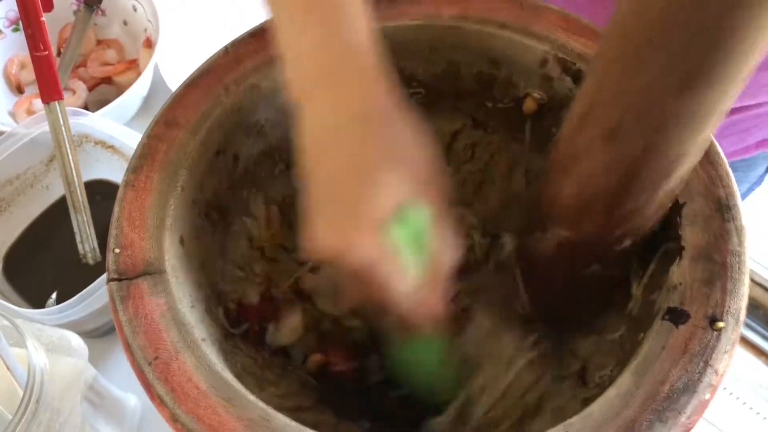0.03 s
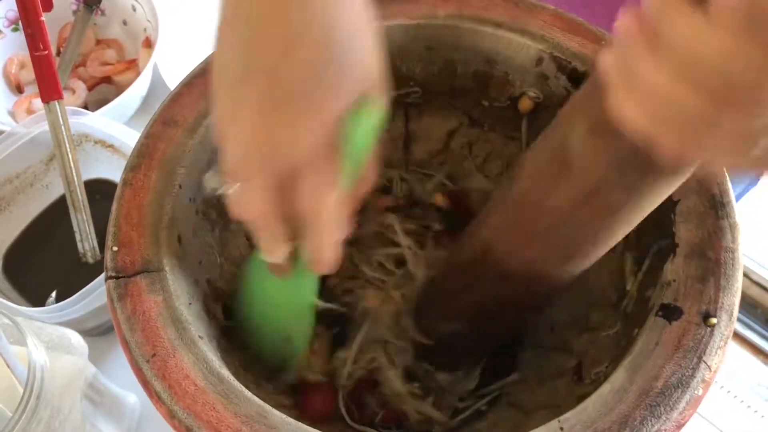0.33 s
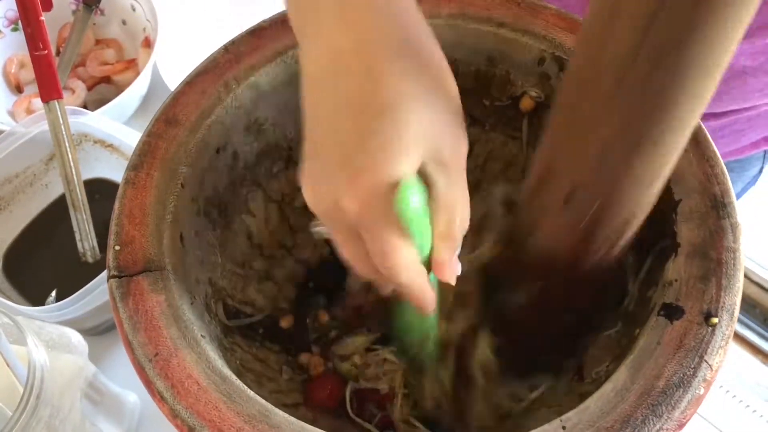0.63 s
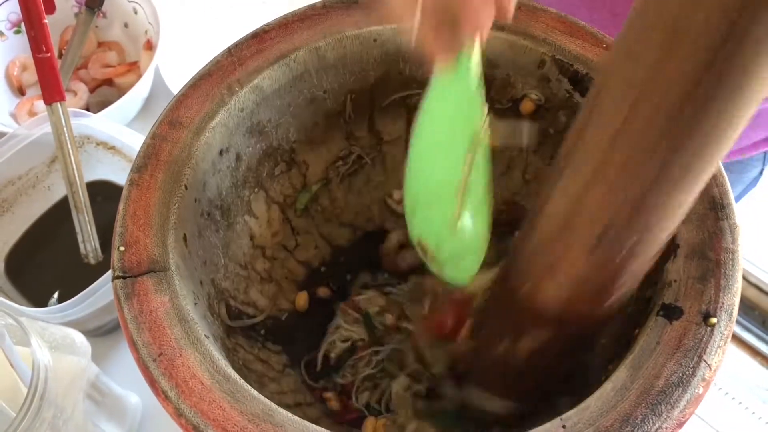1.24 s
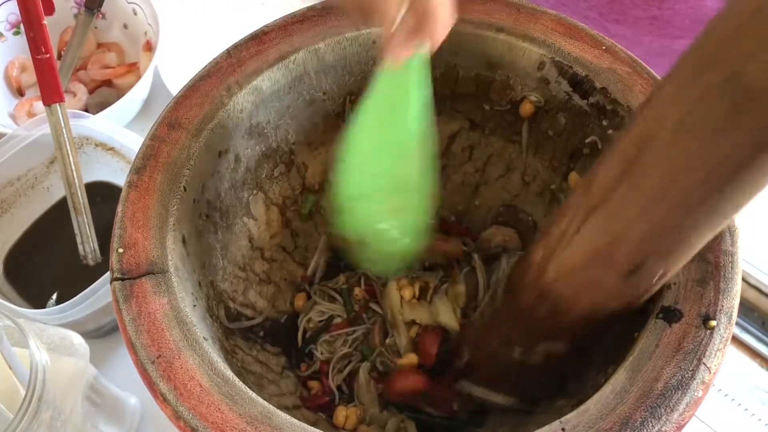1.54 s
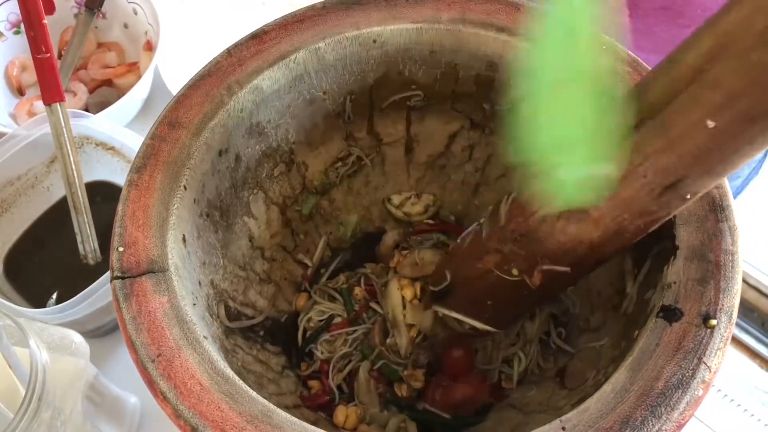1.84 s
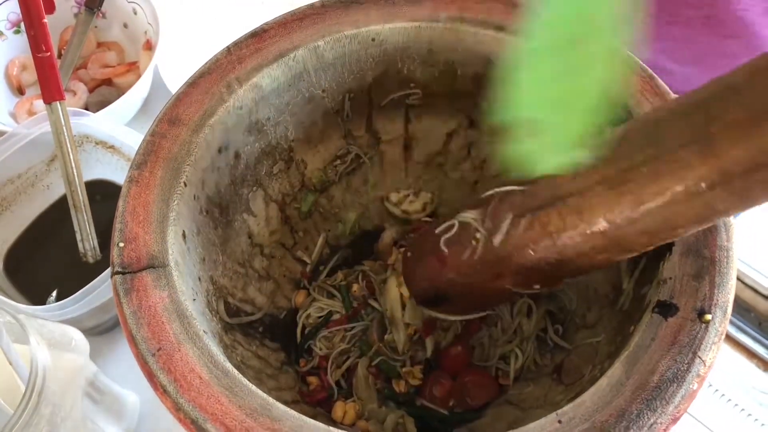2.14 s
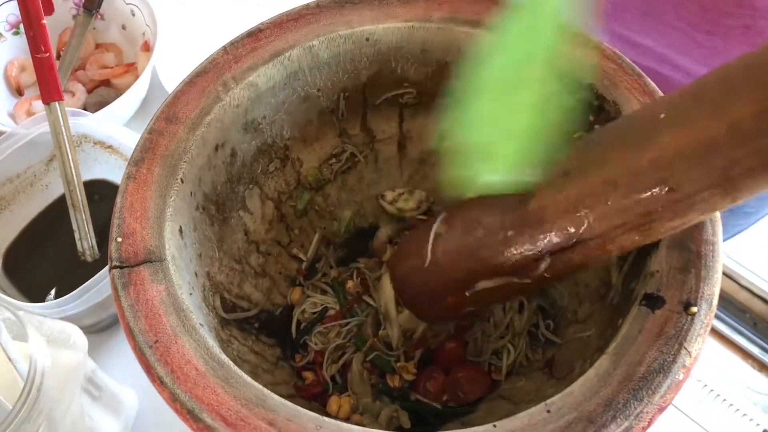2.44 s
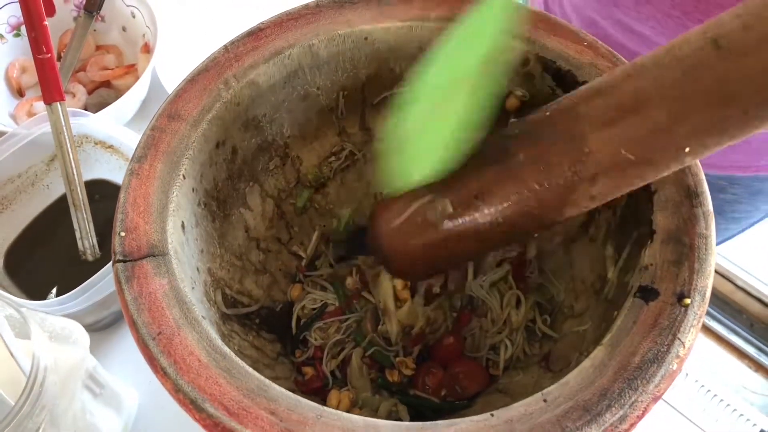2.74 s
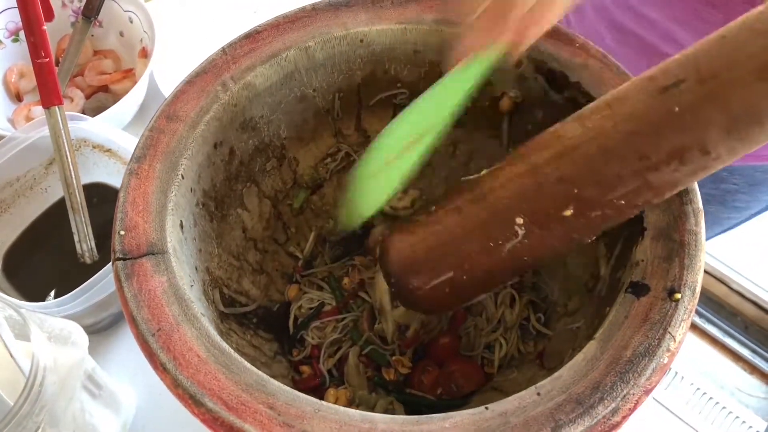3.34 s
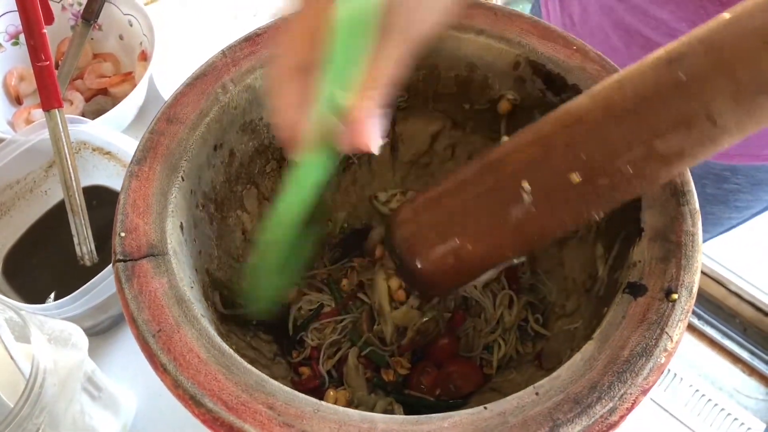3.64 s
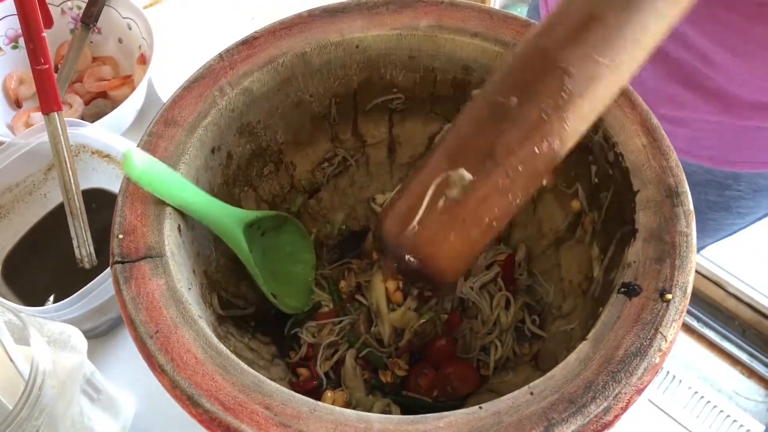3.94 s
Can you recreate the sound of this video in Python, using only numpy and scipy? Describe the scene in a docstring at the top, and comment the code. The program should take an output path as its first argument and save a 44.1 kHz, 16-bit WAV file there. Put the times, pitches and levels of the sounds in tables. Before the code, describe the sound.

Wet salad squelches in a clay mortar before a plastic spoon taps and wipes the pestle.

```python
"""A motor hums in a kitchen throughout. First a plastic spoon turns wet, shredded salad in a
clay mortar: scoops squelch, shreds snap and tiny bubbles burst. Around 1.5 s the mortar is
knocked and rings. From 1.9 s the spoon taps the wooden pestle and wipes down it six times.
Near 3.8 s it is dropped in the bowl. The close microphone clips on the hardest taps."""
import sys
import numpy as np
from scipy import signal
from scipy.fft import rfft, irfft, next_fast_len
from scipy.io import wavfile
from scipy.ndimage import map_coordinates

SR = 44100
rng = np.random.default_rng(int(sys.argv[2]) if len(sys.argv) > 2 else 0)


def inscribe(sig):
    """Save sig as 16-bit PCM at rate SR to the path in sys.argv[1].

    A 1-D sig is mono; a 2-D sig holds one channel per row.
    Samples are clipped to [-1, 1] before scaling.
    """
    pcm = np.round(np.clip(np.atleast_2d(sig).T, -1, 1) * 32767)
    wavfile.write(sys.argv[1], SR, pcm.astype(np.int16))


N = 176400
TOP_HZ = 15900  # highest pitch kept

# tones of the clay wall: f/Hz, level/dB, t60/s (time to fade by 60 dB)
WALL_TONES = [(969, -31.5, 0.65), (1029, -28, .26), (1075, -16, 0.045), (1318, -37, 0.43),
              (1360, -38, 0.12), (1580, -35, 0.12), (1650, -21, 0.35), (1790, -34, .28), (2160, -40, 0.22),
              (2870, -32, .2), (3200, -43, .1), (3900, -55, .18), (4810, -41, .12)]
# tones of the air in the bowl: f/Hz, level/dB, t60/s
HOLLOW_TONES = [(469.3, -26.5, 0.27), (420, -46, 0.24)]


def amp(db):
    return 10 ** (np.asarray(db) / 20)


def unit(x):
    """Scale to an average (rms) strength of 1."""
    return x / np.sqrt(np.mean(x ** 2) + 1e-20)


def along(points, hz):
    """Read a curve of (f/Hz, value) points on a log pitch axis."""
    f, v = np.transpose(points)
    return np.interp(np.log(hz + 1), np.log(f + 1), v)


def seconds(length):
    return np.arange(int(length * SR)) / SR


def add(track, start, x):
    """Mix x into the track at a time in seconds."""
    i = round(start * SR)
    x = x[max(-i, 0):N - i]
    track[max(i, 0):][:len(x)] += x


def gate(t, attack, release):
    """Fade in, hold, fade out."""
    return np.clip(t / attack, 0, 1) * np.clip((t[-1] - t) / release, 0, 1)


def click(colour, cutoff_hz=1e6, size=2048):
    """A click with this colour (level at each pitch), dulled above the cut-off."""
    hz = np.fft.rfftfreq(size, 1 / SR)
    gain = unit(amp(along(colour, hz))) / np.hypot(1, (hz / cutoff_hz) ** 2)
    cepstrum = irfft(np.log(gain))
    cepstrum[1:size // 2] *= 2  # folding packs the energy at the start
    cepstrum[size // 2 + 1:] = 0
    return irfft(np.exp(rfft(cepstrum)))


def friction(t, colour, slips_per_s, grit):
    """Rubbing: tiny random slips over a smooth rush."""
    n = len(t)
    slips = (rng.random(n) < slips_per_s / SR) * rng.choice([-1, 1], n) * rng.uniform(.3, 1, n) ** 2
    rubbing = grit * unit(slips) + rng.standard_normal(n)
    return unit(signal.fftconvolve(rubbing, click(colour))[:n])


def resonance(hz, q):
    """Noise around a gliding pitch; a higher q is more like a whistle."""
    pole = np.exp(-np.pi * hz.mean() / q / SR)
    noise = rng.standard_normal(len(hz)) + 1j * rng.standard_normal(len(hz))
    slow_noise = signal.lfilter([1], np.poly([pole, pole]), noise)
    return unit((slow_noise * np.exp(2j * np.pi * np.cumsum(hz) / SR)).real)


def ring(tones, length, spread_db):
    """Fading tones whose levels vary from blow to blow."""
    t = seconds(length)
    return sum(amp(db + spread_db * rng.standard_normal() - 60 * t / t60) * np.sin(2 * np.pi * hz * t)
               for hz, db, t60 in tones)


def motor():
    """A motor's wavering hum over the soft rush of room air."""
    # steady motor tones: f/Hz, level/dB
    motor_tones = [(53.8, -59), (158, -52), (210, -52.5)]
    # electric hum: t/s, level/dB, octave level/dB
    mains_levels = [(0, -45, -48.5), (1.0, -56, -50.5), (1.3, -47.5, -44.5), (2.0, -52, -47.5),
                    (2.6, -42.5, -43.5), (3.001, -44, -55.5), (4, -44, -54.5)]
    # room air: f/Hz, level/dB
    air_colour = [(20, -26), (45, -18), (114, -8.5), (190, 1), (277, -10.5), (384, -10.5), (624, -15.5),
                  (840, -19.5), (1440, -15.5), (3720, -21), (6050, -25.5), (9070, -36), (20000, -38)]
    t = np.arange(N) / SR

    def wobble(rate):
        return map_coordinates(rng.standard_normal(int(t[-1] * rate) + 4), [t * rate])

    times, low_db, high_db = np.transpose(mains_levels)
    mains_hz = 119.9
    mains = [(mains_hz, np.interp(t, times, low_db)), (2 * mains_hz, np.interp(t, times, high_db))]
    hum = sum(amp(db + 1.8 * wobble(5.07)) * np.sin(2 * np.pi * hz * t + 0.2 * wobble(5.7))
              for hz, db in list(motor_tones) + mains)
    air = unit(signal.fftconvolve(rng.standard_normal(N), click(air_colour))[:N])
    return np.sqrt(2) * hum + amp(-46) * air


def kitchen_echo(x, stretches=13):
    """The room echoes each stretch of sound a little differently; the highs die first."""
    # how long the echo lasts: f/Hz, t60/s
    fade_times = [(150, 0.61), (500, 0.33), (1400, 0.46), (2400, 0.48), (5000, 0.47), (10000, 0.3),
                  (20000, 0.22)]
    # the echo as it starts: f/Hz, level/dB
    echo_colour = [(100, -1.5), (600, 0.5), (2200, -3), (6000, -6), (10000, -4.5), (20000, -2)]
    out = np.zeros(N)
    for part in np.array_split(np.arange(N), stretches):
        hz, t, noise = signal.stft(rng.standard_normal(SR * 2 // 3), SR, nperseg=256)
        fade = amp(along(echo_colour, hz)[:, None] - 60 * t / along(fade_times, hz)[:, None])
        tail = signal.istft(noise * fade, SR, nperseg=256)[1]
        add(out, part[0] / SR + .006, signal.fftconvolve(x[part], tail / np.linalg.norm(tail)))
    return out


def bowl_ring(x):
    """Stirring rings the air in the bowl and, faintly, its wall, which the food muffles."""
    hollow = ring(HOLLOW_TONES, length=.4, spread_db=3)
    ringing = hollow + amp(-9) * ring(WALL_TONES, length=.4, spread_db=1)
    return x + amp(-21.5) * signal.fftconvolve(x, ringing / np.linalg.norm(ringing))[:N]


def wall_echoes(x, t):
    """Echoes off the bowl's wall come sooner as the spoon travels."""
    # echo paths: delay/s, gain
    paths = [(.00095, 0.26), (.0017, 0.57), (.0026, 0.12)]
    shrink = 1 - 0.24 * t / t[-1]
    echoes = sum(gain * np.interp(t - delay * shrink, t, x, left=0) for delay, gain in paths)
    return (x + echoes) / np.sqrt(1 + sum(gain ** 2 for _, gain in paths))


def contact(pulse, t60=0.022):
    """A sharp hit, then its echoes scattering inside the bowl."""
    t = seconds(.06)
    scatter = rng.standard_normal(len(t)) * amp(-60 * t / t60) * np.clip(t / 0.00035, 0, 1)
    scatter *= amp(-3.5) / np.linalg.norm(scatter)
    scatter[0] = 1  # the hit itself
    return signal.fftconvolve(scatter, pulse)


def juice(count=900, low_hz=2260, high_hz=14000, fade_cycles=18.5):
    """Tiny bubbles burst, each at its own pitch, loudest while the salad is turned."""
    # loudest bubbles: t/s, level/dB
    peak_levels = [(0, -18), (.13, -24), (.3, -16), (.55, -19.5), (.7, -19.5), (.95, -9), (1.1, -23),
                   (1.2, -23.5), (1.349, -24), (1.6, -24), (1.899, -42), (4, -43)]
    out, t = np.zeros(N), seconds(.008)
    for when, pitch, faintness in rng.random((count, 3)):
        start = when * N / SR
        hz = low_hz * (high_hz / low_hz) ** pitch
        db = np.interp(start, *np.transpose(peak_levels)) - 18 * np.sqrt(faintness)
        envelope = amp(db - 60 * t * hz / fade_cycles) * (1 - np.exp(-t * hz))
        add(out, start, envelope * np.sin(2 * np.pi * hz * t))
    return out


def thuds(t60=0.031):
    """Pestle and spoon bump on damp shreds, which soon stop the ringing."""
    # soft bumps: t/s, level/dB, f/Hz
    bumps = [(0.1162, -20, 270), (.219, -21.5, 212), (1.59, -17, 262), (1.634, -18.5, 242),
             (1.677, -28, 310), (2.26, -21, 360)]
    out = np.zeros(N)
    for start, db, hz in bumps:
        add(out, start, ring([(hz, db, t60)], length=.06, spread_db=3))
    return out


def scoops():
    """The spoon squelches through wet salad with a hollow, gliding pitch."""
    # scoops: t/s, length/s, level/dB, first f/Hz, last f/Hz
    strokes = [(-.02, 0.078, -29, 2400, 1373), (0.033, 0.049, -23.5, 1300, 670),
               (.208, 0.027, -26.5, 1050, 870), (0.234, .1, -34, 1400, 1164),
               (0.431, 0.11, -40.5, 2000, 1686), (.49, .085, -30, 1900, 946),
               (0.667, .11, -38.5, 1300, 1690), (0.948, 0.082, -26.5, 1500, 1059),
               (1.027, .12, -44.5, 1200, 1098)]
    # wet rubbing: f/Hz, level/dB
    wet_colour = [(100, -34), (450, 5.5), (1100, 0.5), (2800, -4), (5000, -24), (16000, -22)]
    out = np.zeros(N)
    for start, length, db, first_hz, last_hz in strokes:
        t = seconds(length)
        glide = np.geomspace(first_hz, last_hz, len(t))
        rub = friction(t, wet_colour, slips_per_s=1100, grit=1.2)
        squelch = rub + amp(3) * resonance(glide, q=2) + amp(-8.5) * resonance(2.3 * glide, q=3.5)
        add(out, start, amp(db) * unit(wall_echoes(squelch, t)) * gate(t, attack=0.013, release=0.023))
    return out


def crunches():
    """Shreds crunch under the spoon."""
    # crunches: t/s, length/s, level/dB
    presses = [(-.02, 0.074, -28.5), (0.185, 0.094, -38), (0.262, 0.041, -26), (0.287, 0.056, -44),
               (0.369, 0.05, -29), (0.419, 0.077, -30.5), (0.479, 0.06, -33), (0.663, 0.14, -42.5),
               (0.779, 0.1, -33.5), (0.875, 0.023, -22.5), (0.895, 0.057, -26.5), (0.951, 0.083, -36.5),
               (1.028, 0.17, -49), (1.282, 0.12, -42), (1.479, 0.063, -22.5), (1.706, 0.064, -28)]
    # crushed shreds: f/Hz, level/dB
    crisp_colour = [(200, -20), (900, -1.5), (2300, 3), (4000, 1), (7000, -4), (10000, -7.5), (16000, -13)]
    out = np.zeros(N)
    for start, length, db in presses:
        t = seconds(length)
        crunch = friction(t, crisp_colour, slips_per_s=540, grit=0.74)
        add(out, start, amp(db) * wall_echoes(crunch, t) * gate(t, attack=0.0052, release=0.031))
    return out


def drags():
    """The spoon drags on the clay with a low, gritty scrape."""
    # drags: t/s, length/s, level/dB
    strokes = [(0.081, 0.097, -38.5), (.21, 0.16, -39), (.47, 0.12, -39.5), (0.623, 0.058, -35.5),
               (0.678, 0.12, -34), (0.937, 0.12, -38), (1.588, .05, -27), (1.629, 0.082, -35)]
    # scraped clay: f/Hz, level/dB
    clay_colour = [(25, -34), (60, -19), (130, -6), (240, -4), (350, -8), (470, 6), (580, -12.5),
                   (1300, -11), (4000, -26), (16000, -44)]
    out = np.zeros(N)
    for start, length, db in strokes:
        t = seconds(length)
        scrape = friction(t, clay_colour, slips_per_s=250, grit=2.1)
        add(out, start, amp(db) * scrape * gate(t, attack=0.0027, release=0.033))
    return out


def snaps(rise_s=0.00018):
    """Wet shreds tear, each in a brief cluster of cracks."""
    # tears: t/s, relative level/dB
    tears = [(0.3752, 0), (0.3991, -7), (0.448, -14.5), (0.461, -12), (.787, -3.5), (0.81, -9),
             (0.821, -11), (0.834, -14), (0.852, -17), (0.8828, -12.5), (.9055, -25), (1.3104, -19.5),
             (1.464, -20), (1.4942, 2), (2.2604, 2), (2.5763, 1), (2.9038, 3.5), (3.2309, -3)]
    # one crack: f/Hz, level/dB
    crack_colour = [(100, -40), (450, -2.5), (850, -21.5), (1500, -7), (3000, 2.5), (5000, -1),
                    (7500, -3.5), (11000, -11), (16000, -6)]
    out = np.zeros(N)
    age = seconds(.003) / rise_s
    for start, db in tears:
        cracks = rng.choice([-1, 1], len(age)) * age * np.exp(-age)
        burst = np.convolve(cracks, click(crack_colour))
        add(out, start, amp(db + 11) * contact(burst / np.linalg.norm(burst)))
    return out


def knocks():
    """Blows on the clay: dull through the salad, bright and ringing on the bare wall."""
    # blows: t/s, relative level/dB, cut-off f/Hz (higher is harder), wall/dB, hollow/dB
    blows = [(0.1923, -17.5, 1700, -12, -5), (.218, -10, 1040, 5, 4), (.714, -3, 833, -20, 8.5),
             (1.4716, -1.5, 11200, 0, 3.5), (1.5905, -4, 710, -11, 3), (1.6999, 4, 9700, -3.5, 2),
             (3.468, -23, 990, -6, 3), (3.735, -19, 1176, -15, -7), (3.766, -13.5, 1720, -21, -7),
             (3.8045, 1, 2730, 0, 3), (3.967, -11, 1500, -1, 4.5)]
    # struck clay: f/Hz, level/dB
    knock_colour = [(30, -40), (90, -21), (160, -14), (400, -0.5), (750, -5), (1400, 5), (3000, -1.5),
                    (7000, 0), (16000, -13.5)]
    out = np.zeros(N)
    for start, db, cutoff_hz, wall_db, hollow_db in blows:
        add(out, start, amp(db + 15.5) * contact(click(knock_colour, cutoff_hz)))
        dulled = [(hz, level - 20 * np.log10(np.hypot(1, (hz / cutoff_hz) ** 2)), t60)
                  for hz, level, t60 in WALL_TONES]
        wall = amp(wall_db) * ring(dulled, length=.5, spread_db=1.5)
        hollow = amp(hollow_db) * ring(HOLLOW_TONES, length=.5, spread_db=2.5)
        add(out, start, amp(db - 5.5) * (wall + hollow))
    return out


def wipes(pitch_rise=.17, squelch_s=0.042):
    """The spoon rasps down wet wood; its tone rises and fades as the juicy spray grows."""
    # wipes: t/s, length/s, level/dB, spray/dB, f/Hz, squelch/dB
    strokes = [(1.956, 0.091, -19.5, -4.5, 2035, -5.5), (2.257, 0.088, -18, -0.5, 1998, -10.5),
               (2.573, 0.095, -17.5, -5.5, 2147, -15), (2.9, 0.085, -16, -5, 2064, -10.5),
               (3.232, 0.1, -18, -6, 2279, -10.5), (3.509, 0.085, -25, -7.5, 2109, -15.5)]
    # rubbed wood: f/Hz, level/dB
    rasp_colour = [(80, -44), (170, 3.5), (290, -19), (600, -18.5), (1000, -8.5), (1450, -0.5), (2400, 4.5),
                   (3400, 1), (5000, -6), (8000, -17), (16000, -44)]
    # tones of the sliding spoon: multiple of its pitch, level/dB
    slide_tones = [(.63, -13.5), (1, -2.5), (1.55, -17)]
    # spraying juice: f/Hz, level/dB
    spray_colour = [(200, -33), (900, -5.5), (1700, -14.5), (3800, 7.5), (7000, 2.5), (10000, -2),
                    (16000, -9.5)]
    out = np.zeros(N)
    for start, length, db, spray_db, hz, squelch_db in strokes:
        t = seconds(length)
        progress = t / length
        rasp = friction(t, rasp_colour, slips_per_s=1100, grit=1.16)
        glide = hz * (1 + pitch_rise * progress)
        tone = sum(amp(level) * resonance(k * glide, q=12.8) for k, level in slide_tones)
        body = unit(rasp + tone) * amp(1.5 - 14 * progress ** 2)
        spray = friction(t, spray_colour, slips_per_s=1400, grit=0.93)
        spray *= amp(spray_db - 18 * (progress - .68) ** 2)
        add(out, start, amp(db) * wall_echoes(body + spray, t) * gate(t, attack=0.016, release=0.013))
        # the spoon meets the salad at the foot of the wipe
        t = seconds(squelch_s)
        squelch = resonance(np.geomspace(1068, 693, len(t)), q=1.4) * gate(t, attack=.01, release=0.028)
        add(out, start + length - squelch_s, amp(db + squelch_db) * squelch)
    return out


def taps():
    """The plastic spoon clacks on the pestle and rings briefly."""
    # taps: t/s, relative level/dB, f/Hz
    hits = [(.9056, -6.5, 2300), (1.9206, 7, 2447), (1.9586, 1.5, 1980), (2.249, 7.5, 2500),
            (2.2596, -1.5, 2620), (2.562, 6, 2556), (2.5769, 1, 2130), (2.8814, -0.5, 2520),
            (2.9036, -1, 2810), (3.2184, 4.5, 2560), (3.2305, -2.5, 3030), (3.766, -11.5, 2440),
            (3.8053, 2.5, 3180)]
    # plastic on wood: f/Hz, level/dB
    clack_colour = [(100, -39.5), (400, -7), (800, -10.5), (1500, -2.5), (2600, 2.5), (4000, -1.5),
                    (7000, -14.5), (11000, -30), (16000, -33)]
    # tones of the struck spoon: multiple of its pitch, level/dB, t60/s
    spoon_tones = [(.16, -25, 0.03), (.56, -29.5, 0.006), (1, -11.5, 0.026), (1.17, -17, 0.023),
                   (1.69, -29, 0.006), (2.139, -23, 0.0063), (3.07, -23, 0.011)]
    out = np.zeros(N)
    for start, db, hz in hits:
        add(out, start, amp(db + 9) * contact(click(clack_colour)))
        tones = [(hz * k, level, t60) for k, level, t60 in spoon_tones]
        add(out, start, amp(db) * ring(tones, length=.06, spread_db=3.5))
    return out


def scene():
    """The sounds at the bowl, their echo and the motor, in one channel."""
    stirring = scoops() + crunches() + drags() + snaps()
    near = bowl_ring(stirring) + juice() + thuds() + taps() + wipes() + knocks()
    return (near + amp(-14) * kitchen_echo(near) + motor())[None]


def record(dry):
    """The microphone flattens the loudest peaks, and the very highest pitches are cut."""
    clipped = dry / (1 + np.abs(dry) ** 8) ** (1 / 8)
    size = next_fast_len(N + SR // 4)
    low_pass = 1 / np.hypot(1, (np.fft.rfftfreq(size, 1 / SR) / TOP_HZ) ** 80)
    return irfft(rfft(clipped, size) * low_pass, size)[..., :N]


dry = scene()
out = record(dry)
inscribe(out)
```